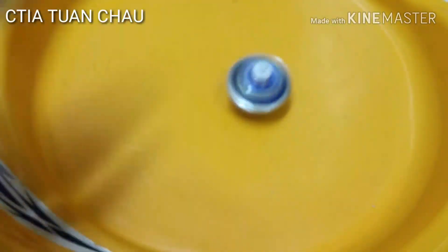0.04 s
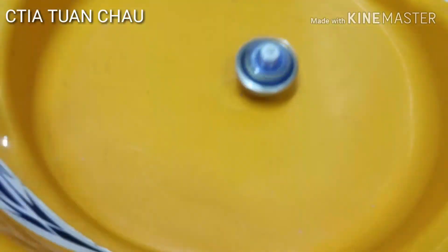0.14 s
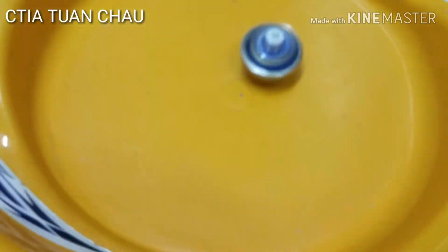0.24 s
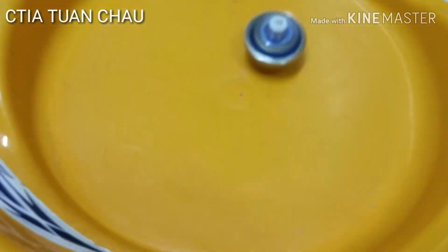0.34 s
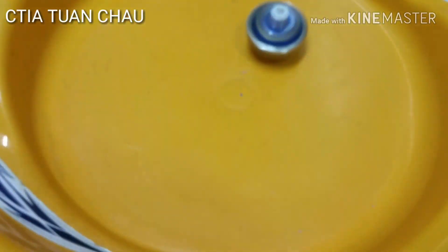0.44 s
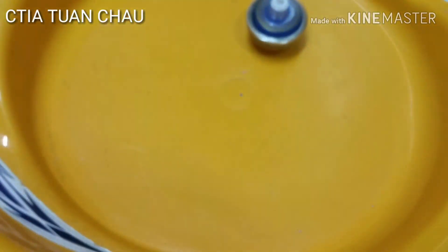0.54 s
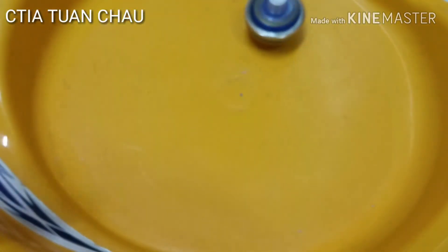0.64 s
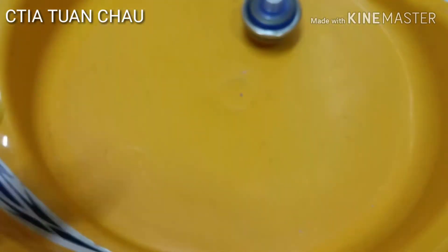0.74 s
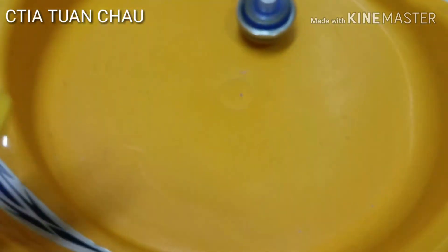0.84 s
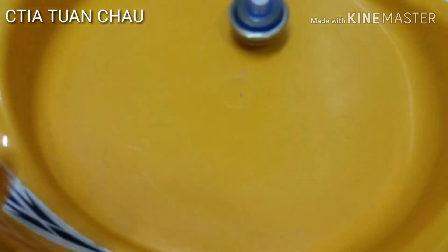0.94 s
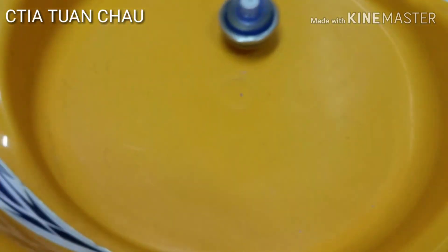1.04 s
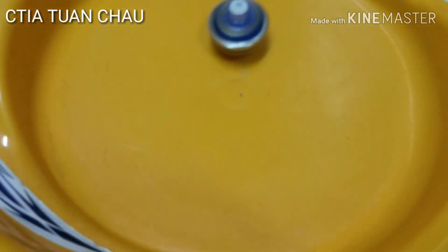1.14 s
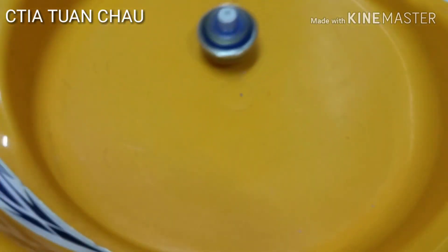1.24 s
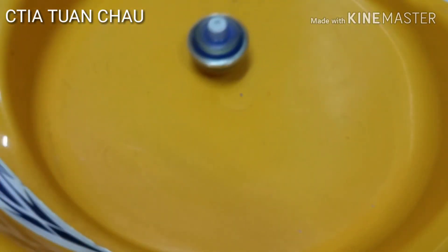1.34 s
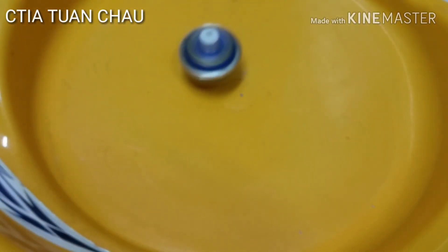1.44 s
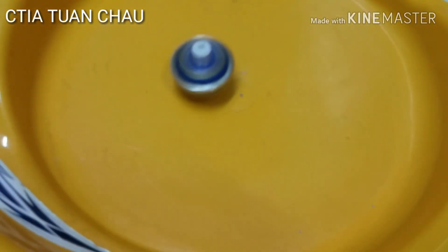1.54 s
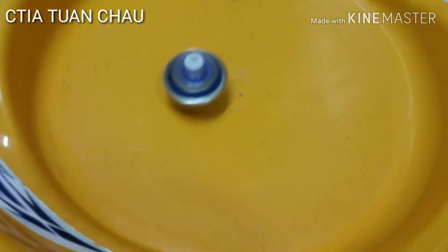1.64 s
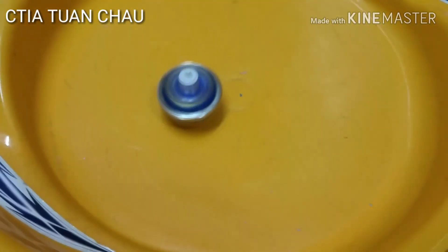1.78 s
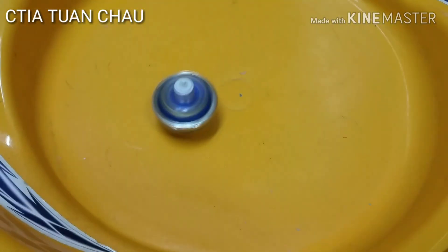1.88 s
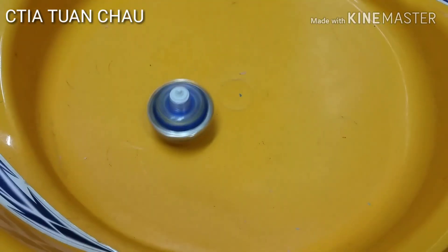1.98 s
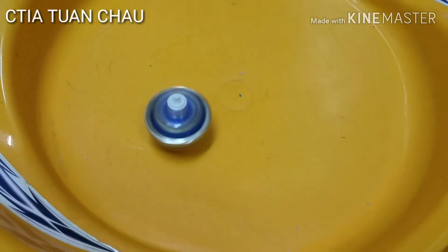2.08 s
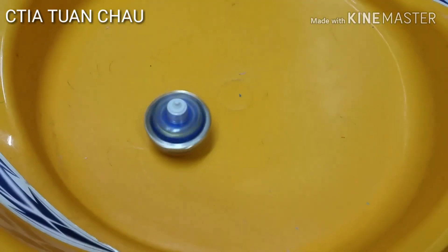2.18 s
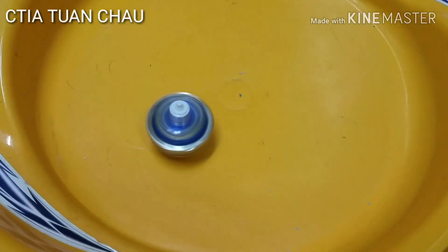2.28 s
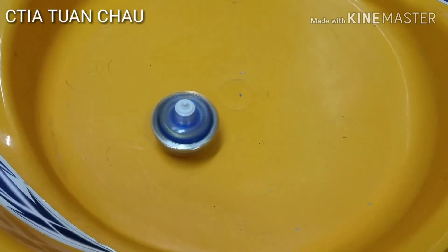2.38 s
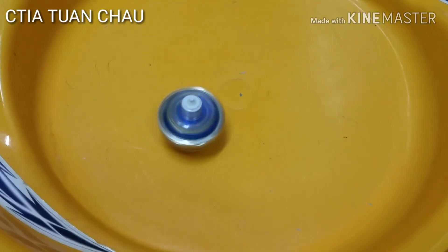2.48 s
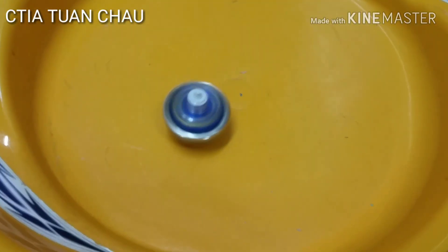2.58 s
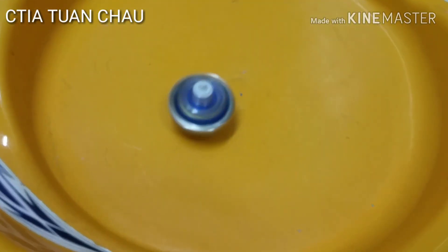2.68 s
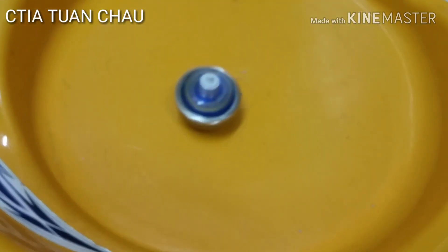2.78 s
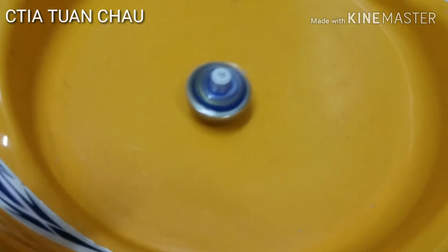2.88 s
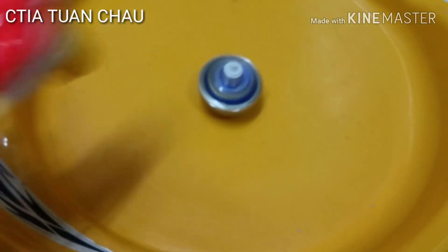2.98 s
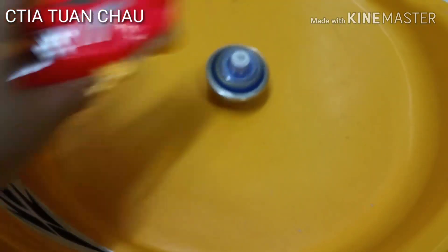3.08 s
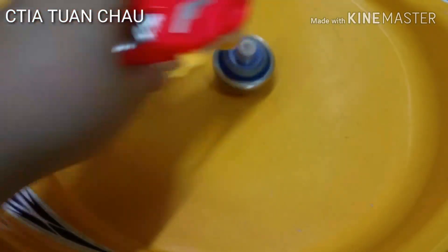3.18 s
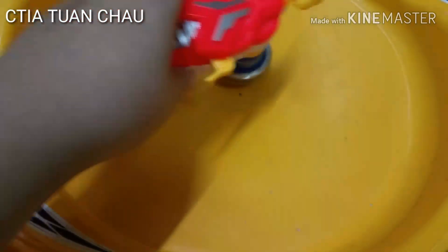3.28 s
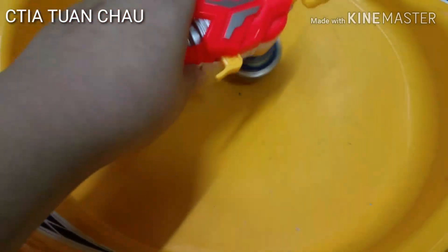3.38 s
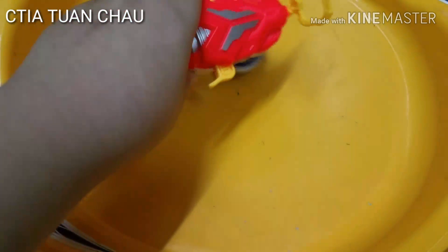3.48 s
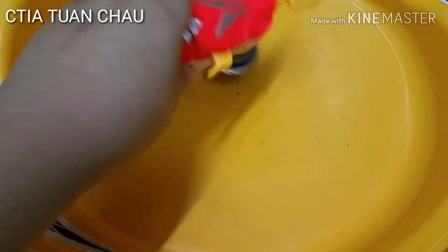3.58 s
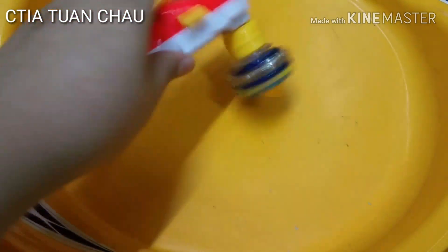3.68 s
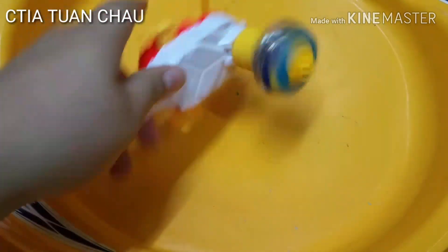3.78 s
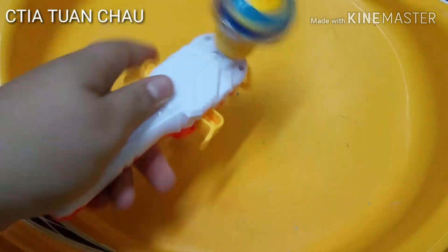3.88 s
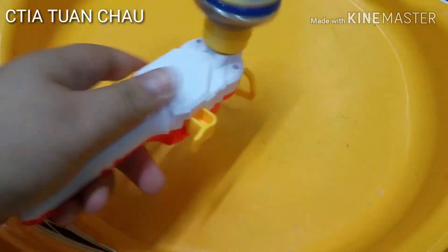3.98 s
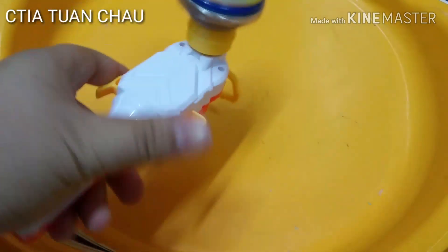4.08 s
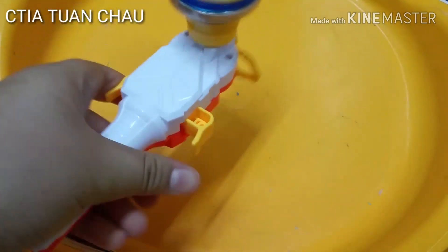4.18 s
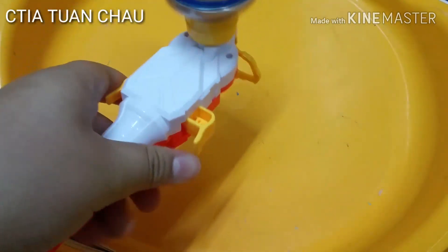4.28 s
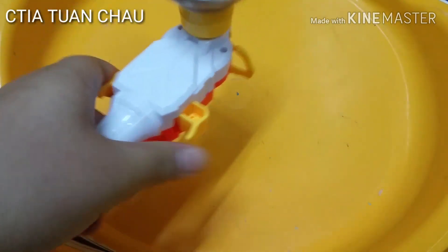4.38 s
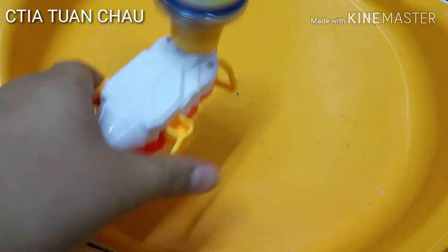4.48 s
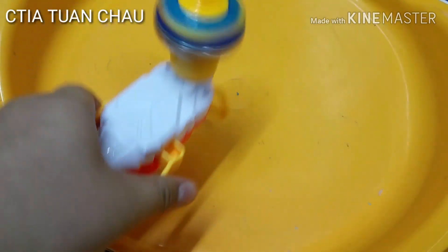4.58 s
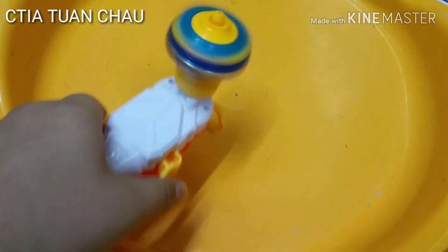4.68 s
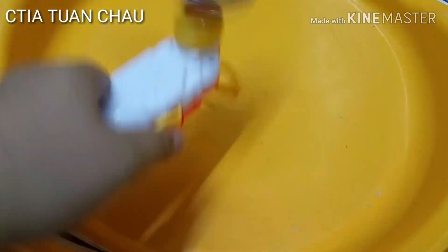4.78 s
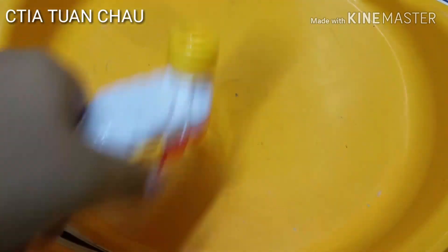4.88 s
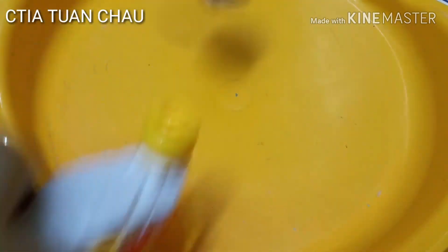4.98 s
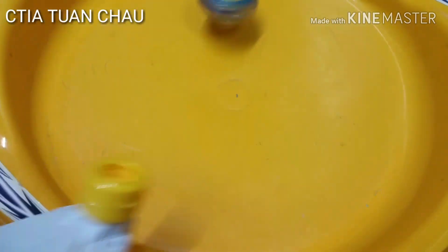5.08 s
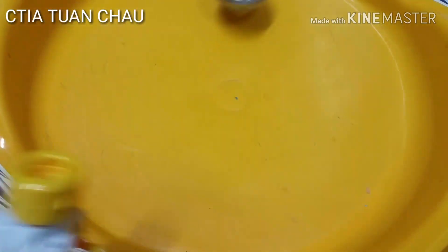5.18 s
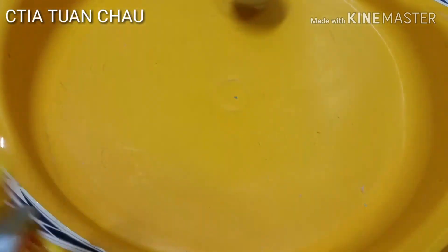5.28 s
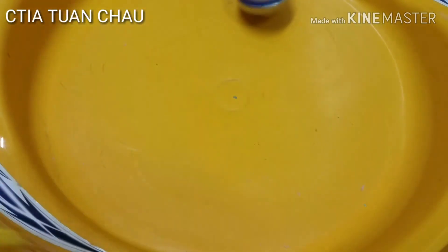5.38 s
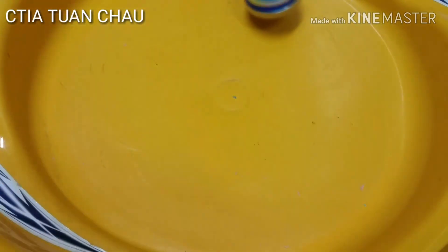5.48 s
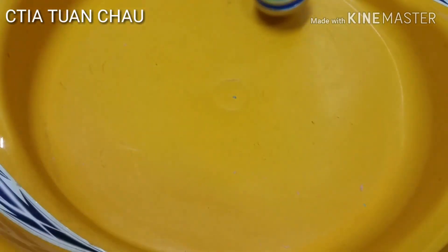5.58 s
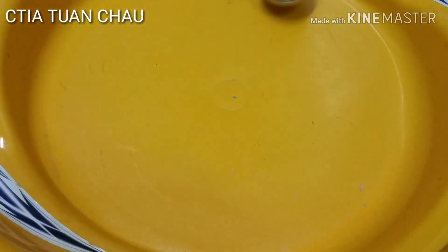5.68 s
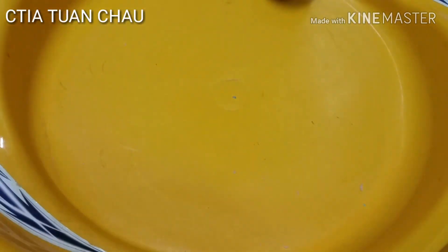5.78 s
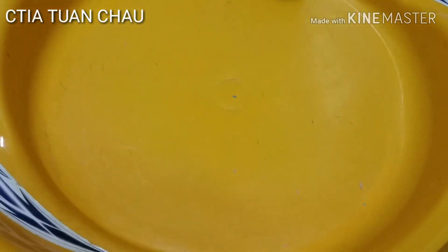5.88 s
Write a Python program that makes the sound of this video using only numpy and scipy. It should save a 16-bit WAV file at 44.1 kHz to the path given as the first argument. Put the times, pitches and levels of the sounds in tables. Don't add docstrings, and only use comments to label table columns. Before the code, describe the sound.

A phone close to a plastic basin in a small room, with a low unsteady fan hum and soft air noise behind. From 0 to 3.3 s a metal-rimmed top spins quietly, slightly left: an airy whir around 2.4 kHz, fine rasp and hiss, dipping near 0.2-0.7 s, with faint low basin tones swelling and a few light ticks at the start and near 3.0-3.2 s. At 3.35 s a plastic launcher catches it: a dense burst of sharp clicks and harsh scraping for a tenth of a second, grinding, then hollow knocks at 3.5-3.6 s. Loose gears rattle brightly, with a snap at 3.73 s, weakening in waves until 5.1 s; another snap at 4.84 s. At 5.11 s the top drops with a huge hollow boom, strong bounces at 5.16 and 5.23 s, then smaller, shrinking knocks and a faint roll to about 5.95 s. The fan ducks after the boom, then returns.

```python
import sys
import numpy as np
from scipy import signal
from scipy.fft import rfft, irfft, next_fast_len
from scipy.io import wavfile
from scipy.ndimage import uniform_filter1d, map_coordinates

SR = 44100
rng = np.random.default_rng(int(sys.argv[2]) if len(sys.argv) > 2 else 0)


def boost(x):
    u = np.asarray(x, float) / 20
    return 10 ** u


def to_wav(sig):
    pcm = np.clip(np.atleast_2d(sig), -1, 1) * 32767
    pcm = np.round(pcm).astype(np.int16)
    wavfile.write(sys.argv[1], SR, pcm.T)


N = 261954
TOP_HZ = 15600
SEATED_S = 3.49

# (frequency [Hz], width [Hz], level [dB])
SHELL = [(1977, 330, 2.5), (2430, 830, 1.5), (2795, 76, 6), (3130, 600, -3.5), (4190, 520, 0.5)]
# (frequency [Hz], density [dB per Hz])
FIZZ = [(3000, -41.5), (4300, 1.5), (5300, -0.5), (6500, -4.5), (7500, -5.5), (9500, -4.5), (11500, -9),
        (13000, -11.5), (15400, -12), (16200, -68)]
# (frequency [Hz], width [Hz], level [dB])
HOLLOW = [(454, 780, -8.5), (955, 176, 3), (1197, 210, 1), (1694, 290, 3)]
# (frequency [Hz], width [Hz], level [dB])
SOCKET = [(2120, 340, -0.5), (2378, 97, 5.5), (2700, 660, -13)]
# (frequency [Hz], likeness [0-1])
RATTLE_ALIKE = [(100, 0.95), (600, 0.95), (1500, 0.59), (3000, 0.18), (8000, 0.088)]
# (frequency [Hz], level [dB], decay t60 [s])
BOOM = [(108, -2, 0.3), (166, -1, 0.227), (230, -0.5, 0.15), (253, 1.5, 0.11), (278.6, -2.5, 0.48),
        (331.4, -10.5, 0.46), (352, -2.5, 0.12), (389, 1.5, 0.12), (434, -1, 0.08), (495, -12, 0.3),
        (559, -8, 0.24), (626, -14, 0.076), (818, -31.5, 0.13)]


def unit(x):
    return x / np.sqrt(np.mean(x ** 2) + 1e-20)


def along(points, hz):
    f, v = np.transpose(points)
    return np.interp(np.log(hz + 1), np.log(f + 1), v)


def curves(rows):
    s, *cols = np.transpose(rows)
    t = np.arange(N) / SR
    return np.array([np.interp(t, s, c, left=-150, right=-150) for c in cols])


def wobble(rate):
    coarse = np.arange(0, N + 64, 64)
    knots = rng.standard_normal(int(N * rate / SR) + 4)
    return np.interp(np.arange(N), coarse, map_coordinates(knots, [coarse * rate / SR]))


def filtered(x, response):
    n = x.shape[-1]
    m = 2 * next_fast_len(n // 2 + 2048)
    return irfft(rfft(x, m) * response(np.fft.rfftfreq(m, 1 / SR)), m)[..., :n]


def body(modes):
    def response(f):
        return sum((-1) ** k * boost(db) * 1j * f * w / (c * c - f * f + 1j * f * w)
                   for k, (c, w, db) in enumerate(modes))
    return response


def colour(spectrum):
    def response(f):
        cep = irfft(np.log(boost(along(spectrum, f)) + 1e-6))
        half = len(cep) // 2
        folded = np.r_[cep[0], 2 * cep[1:half], cep[half], np.zeros(len(cep) - half - 1)]
        return np.exp(rfft(folded))
    return response


def grit(rate, spread_db, smooth):
    touch = (rng.random(N) < rate / SR) * boost(spread_db * np.clip(rng.standard_normal(N), -2, 2))
    life = np.exp(-np.arange(96) / 22)
    return (unit(np.convolve(touch, life)[:N]) + smooth) * rng.standard_normal((2, N))


def spread(pair, response, alike, lead=0, patchy_db=2.5):
    z = signal.stft(pair, nperseg=512)[2]
    field = uniform_filter1d(rng.standard_normal(z.shape[1:]), size=3, axis=0)
    field = uniform_filter1d(field, size=12, axis=1)
    pair = signal.istft(z * boost(patchy_db * unit(field)), nperseg=512)[1][:, :N]

    def turn(f):
        return np.arccos(np.clip(along(alike, f), -1, 1)) / 2

    mid, side = filtered(pair, lambda f: response(f) * (f < TOP_HZ) * [np.cos(turn(f)), np.sin(turn(f))])
    return unit(np.array([np.roll(mid + side, -round(lead)), mid - side]))


def sides(pan_db):
    return boost(np.array([[pan_db / 2], [-pan_db / 2]]))


def spinning():
    # (time [s], rub of the tip [dB], give of the basin under it [dB])
    runs = [
        [(0, -50.5, -39), (.17, -58, -58), (.7, -61.5, -61.5), (.78, -52.5, -62), (1.0, -49.5, -62),
         (1.28, -52.5, -48), (1.35, -54, -44.5), (1.5, -53.5, -45), (1.95, -54.5, -47), (2.3, -57, -56),
         (2.85, -56.5, -58), (3.05, -54, -43), (3.345, -57, -45)],
        [(5.45, -60, -47), (5.55, -85.5, -51), (5.66, -77.5, -42), (5.94, -89.5, -47)],
    ]
    # (frequency [Hz], width [Hz], level [dB])
    bearing = [(2880, 150, -2.5), (3500, 1000, -1.5), (4150, 1120, -1), (5120, 1000, -12)]
    # (frequency [Hz], density [dB per Hz])
    torn_air = [(4500, -8), (5800, 1.5), (7000, -2.5), (8000, 0.5), (9000, -4), (10000, -2), (11500, -13),
                (13000, -10), (14200, -5.5), (15400, -16)]
    # (frequency [Hz], density [dB per Hz])
    floor = [(71, 7.5), (120, -0.5), (237, 0), (328, -2.5), (533, -3), (619, -9), (1050, -7), (1330, -17.5),
             (1900, -7.5), (2470, -45), (4180, -120)]
    near = [(200, 1.0), (1000, 0.85), (10000, 0.05)]  # (frequency [Hz], left-right likeness [0-1])

    rasp_db, drum_db = np.max([curves(rows) for rows in runs], axis=0)
    rub_db = rasp_db + 55
    whir_db = -53.5 + 0.4 * rub_db
    whir_db = whir_db - 0.2 * np.maximum(drum_db + 57.5, 0)
    hiss_db = -55.5 + 0.64 * rub_db
    digging = uniform_filter1d(np.clip(np.gradient(rasp_db) * SR, 0, 60), size=SR // 10)
    whir_hz = 2380 + 7 * digging + 45.08 * wobble(5)
    nod = wobble(24.1)

    slow = [filtered(grit(1500, 3.6, smooth=1.7), lambda f: 1 / (1 + 1j * f / 380) ** 2) for _ in range(2)]
    turns = 2 * np.pi * np.cumsum(whir_hz) / SR
    band = slow[0] * np.cos(turns) + slow[1] * np.sin(turns)
    whir = boost(whir_db + .8 * nod) * spread(band, np.ones_like, near, lead=17, patchy_db=1.5)
    rasp = boost(rasp_db + 0.23 * nod) * spread(grit(1900, 4.3, smooth=0.61), body(bearing), near, lead=17)
    hiss = boost(hiss_db + 0.088 * nod) * spread(grit(1900, 6.9, smooth=1.7), colour(torn_air), near, lead=17)
    drum = spread(rng.standard_normal((2, N)), colour(floor), near, lead=9.9)
    drum = boost(drum_db - 1.5 + 0.94 * wobble(26.3)) * drum
    return sides(2.35) * (whir + rasp + hiss + drum)


def singing():
    # (start [s], end [s], frequency [Hz],
    # level [dB])
    sung = [(-.02, 0.09, 108, -44.5), (0.104, 0.265, 516, -58), (0.202, 0.627, 235.6, -62.5),
            (.95, 1.2, 349.5, -64.5), (1.106, 1.564, 235, -52.5), (1.25, 1.86, 548, -59),
            (1.417, 1.785, 275.3, -54), (1.621, 1.761, 515, -60), (1.814, 2.016, 595, -61.5),
            (1.876, 2.197, 267.8, -53.5), (2.544, 2.885, 272.4, -58), (3.348, 3.384, 200.3, -28.5),
            (3.362, 3.45, 71.3, -30), (3.458, 3.62, 109, -34.5), (5.88, 5.945, 173.2, -47.5),
            (3.612, 3.679, 290, -26.5)]
    out, t = np.zeros(N), np.arange(N) / SR
    for start, end, hz, db in sung:
        swell = np.clip(np.minimum(t - start, end - t) / (0.17 * (end - start)), 0, 1)
        level = boost(db + 2.5 + 1.6 * wobble(6.7))
        cycles = hz * t + np.cumsum(1.14 * wobble(18)) / SR
        out += swell * level * np.sin(2 * np.pi * cycles)
    return out


def catch():
    # (time [s], scraping [dB])
    braking = [
        (3.347, -70),
        (3.37, -29.5),
        (3.445, -24),
        (3.475, -44),
        (3.53, -38),
        (3.68, -42),
        (4.05, -71),
    ]
    scrape_db, = curves(braking)
    t = np.arange(N) / SR
    grind_db = -32.5 - .7 * np.maximum(scrape_db + 34, 0)
    grind_db = grind_db - 150 * np.maximum(t - 3.653, 0)
    grind_db = grind_db - 150 * (t < braking[0][0])
    basin = [(hz, 30, db) for hz, db, _ in BOOM]
    scrape = spread(grit(350, 3.3, smooth=0.82), body(SOCKET), RATTLE_ALIKE, lead=2)
    grind = spread(grit(300, 1.3, smooth=0.99), body(basin), RATTLE_ALIKE)
    return boost(scrape_db) * sides(-1.5) * scrape + boost(grind_db) * grind


def rattle():
    # (time [s], shaking [dB])
    shaking = [
        (3.347, -29),
        (3.55, -34),
        (3.8, -34.5),
        (3.94, -34.5),
        (4.12, -40),
        (4.25, -37.5),
        (4.6, -40),
        (4.9, -37.5),
        (5.105, -51),
    ]
    shell_db, = curves(shaking)
    shake_db = shell_db + 36
    fizz_db = -36.5 + shake_db
    hollow_db = -41 + 1.77 * shake_db
    chatter = grit(1200, 0.61, smooth=1.0) * boost(1.13 * wobble(45))
    fine = unit(grit(2000, 1.7, smooth=0.96)) * np.std(chatter)
    shell = spread(chatter, body(SHELL), RATTLE_ALIKE, lead=3)
    fizz = spread(0.75 * chatter + fine, colour(FIZZ), RATTLE_ALIKE, lead=3)
    hollow = spread(grit(600, 3.6, smooth=0.88), body(HOLLOW), RATTLE_ALIKE)
    return (boost(shell_db) * sides(-0.75) * shell + boost(fizz_db) * sides(-2.0) * fizz
            + boost(hollow_db + 0.43 * wobble(30)) * hollow)


def snaps():
    # (time [s], peak [dB], brightness [dB])
    stutter = [(3.347, -12.5, -7.5), (3.3528, -12, 0), (3.3624, -17, -4), (3.377, -19, -2),
               (3.392, -12, -5), (3.4024, -21.5, 6.5), (3.4167, -17.5, 1), (3.4247, -15.5, -5),
               (3.4343, -26.5, -2), (3.4502, -14.5, -3), (3.4579, -7, -3), (3.468, -8, 3)]
    # (time [s], peak [dB], brightness [dB])
    slips = [(3.5234, -15.5, 5), (3.6206, -23, -12), (3.719, -16.5, -2), (3.7275, -9.5, -3.5),
             (3.8934, -21, 2), (4.14, -23, -2), (4.1949, -21.5, -5), (4.2147, -23, 2.5), (4.2482, -23, 0.5),
             (4.282, -26, -15), (4.415, -27, 4), (4.4767, -26, 2), (4.4834, -23, 6.5), (4.6159, -22, 2),
             (4.7111, -29, 6), (4.8357, -11.5, -4), (4.897, -35, 16), (4.9723, -30, 11.5),
             (5.4334, -25.5, 4), (5.789, -30, 2), (5.833, -45, -5), (5.9085, -47, -0.5)]
    out, t = np.zeros((2, N + SR)), np.arange(SR // 16) / SR
    for s, db, bright_db in stutter + slips:
        seated = s >= SEATED_S
        dull_db, pan_db = np.array([-9, -1]) + rng.standard_normal(2) * [1, .5]
        length_ms = (6.65 if seated else 2.6) + 0.38 * (db + 18.5)
        u = t / (abs(length_ms) * 0.00034 + 1e-4)
        shared, own = rng.standard_normal(len(t)), rng.standard_normal((2, len(t)))
        burst = u * np.exp(1 - u) * (shared + 2.37 * own)
        paths = (body(SHELL if seated else SOCKET), colour(FIZZ), body(HOLLOW))
        parts = [filtered(burst, path) for path in paths]
        gains = boost(db + np.array([0, bright_db, dull_db]))
        slip = sum(g * p / np.abs(p).max() for g, p in zip(gains, parts))
        out[:, round((s - .0005) * SR):][:, :len(t)] += sides(pan_db) * slip
    return out[:, :N]


def ring(modes, t, factor, attack, twist):
    luck = rng.standard_normal((len(modes), 2)) * [2, .008]
    x = 0
    for k, ((hz, db, t60), (more_db, shift)) in enumerate(zip(modes, luck)):
        fade = boost(db + more_db - 60 * t / (t60 * factor))
        x = x + fade * np.sin(2 * np.pi * hz * (1 + shift) * t + twist * k)
    x = x * (1 - np.exp(-t / attack))
    return x / np.abs(x).max()


def knocks():
    # (time [s], boom [dB], hardness [dB]); tip first is hard, a rock onto the rim is soft
    blows = [(0.001, -33.5, -11), (0.104, -39.5, -5.5), (0.125, -40.5, -4.5), (3.028, -37, -22),
             (3.174, -36.5, -9.5), (3.347, -27, 1.5), (3.402, -24.5, 4.5), (3.522, -17.5, -9),
             (3.599, -13.5, 1.5), (3.611, -16, -23), (4.711, -36.5, 0), (5.11, 1, -8.5),
             (5.161, -6.5, -20.5), (5.229, -3.5, -7.5), (5.279, -17, -35), (5.3255, -13, -6.5),
             (5.4254, -16, -2), (5.467, -25.5, -12.5), (5.524, -25, -4), (5.561, -26, -3.5),
             (5.613, -31.5, -9.5), (5.641, -27.5, -13.5), (5.733, -41.5, -2.5), (5.922, -32.5, -31.5),
             (5.933, -27.5, -18.5)]
    # (frequency [Hz], level [dB], decay t60 [s])
    high_modes = [(687, -2, 0.093), (913, -1, 0.11), (1011, -1.5, 0.14), (1113, 2, 0.047),
                  (1293, -11, 0.083), (1472, 4.5, 0.058), (1766, -1.5, 0.1), (2246, -8.5, 0.23),
                  (2230, -11, 0.085), (2813, -9, 0.11)]
    # (frequency [Hz], density [dB per Hz])
    close_modes = [(250, -0.5), (500, 13), (700, 3), (1100, -2), (1700, -8), (2500, -20.5), (4000, -32),
                   (8000, -81)]
    # (frequency [Hz], density [dB per Hz])
    contact = [(1500, -43.5), (2500, 0), (4500, -5), (7500, -14), (11000, -15.5), (16500, -19.5)]
    out, t = np.zeros((2, N + SR)), np.arange(SR // 3) / SR
    basin = [(hz, 28, db) for hz, db, _ in BOOM]
    for s, db, clack_db in blows:
        factor = 0.36 if 3.45 < s < 3.7 else 0.56
        crack_db = -3 + 0.86 * clack_db

        shudder = unit(filtered(rng.standard_normal((2, len(t))), body(basin)))
        shudder = shudder[0] + 0.17 * shudder[1] * np.array([[1], [-1]])
        rocking = boost(-60 * t / (0.33 * factor)) * (1 - np.exp(-t / 0.0023))
        boom = -ring(BOOM, t, factor, 0.0036, twist=-0.33) + 0.39 * rocking * shudder

        clack = np.array([ring(high_modes, t, factor, 0.00017, twist=1.353)
                          + 0.14 * ring(high_modes, t, factor, 0.0034, twist=side) for side in (.6, 2.4)])
        wash = rng.standard_normal(len(t)) + .5 * rng.standard_normal((2, len(t)))
        wash = filtered(wash, lambda f: colour(close_modes)(f) * (f < TOP_HZ))
        clack += 0.8 * boost(-60 * t / (0.3 * factor)) * unit(wash)
        clack += boost(-8.5 - .45 * max(db, -26) - 60 * t / 0.04) * np.sin(2 * np.pi * 1430 * t)

        grain = rng.standard_normal(len(t)) + rng.standard_normal((2, len(t)))
        buzz = 0.16 * boost(-60 * t / 0.22) * filtered(grain, lambda f: f < TOP_HZ)
        crack = filtered(boost(-60 * t / 0.015) * grain + buzz, colour(contact))

        blow = boom + boost(clack_db - 4.0) * clack + boost(crack_db) * crack / np.abs(crack).max()
        start = round((s + .0008) * SR)
        out[:, start:][:, :len(t)] += boost(db) * sides(0.5) * blow
    return out[:, :N]


def walls(x):
    # (frequency [Hz], decay t60 [s])
    decay = [(150, 0.23), (1000, 0.32), (4000, 0.12), (12000, 0.12)]
    hz, t, z = signal.stft(rng.standard_normal((2, SR // 2)), SR, nperseg=256)
    tail = signal.istft(z * boost(-60 * t / along(decay, hz)[:, None]), SR, nperseg=256)[1]
    late = np.pad(x, ((0, 0), (260, 0)))
    return signal.fftconvolve(late, tail / np.linalg.norm(tail[0]), axes=1)[:, :N]


def room_noise():
    # (time [s], gain [dB])
    auto_gain = [(0, -4.5), (.63, -7.5), (.85, -3), (1.04, 0.5), (1.5, 2), (3.3, 1), (5.06, 1.5),
                 (5.12, -14), (5.5, -1.5), (5.75, -8.5), (5.94, -8.5)]
    # (frequency [Hz], level [dB], width [Hz])
    fan = [(47.6, -44.5, 0.6), (102, -56, 8), (140.4, -58.5, 9.9), (178, -65, 13)]
    # (frequency [Hz], density [dB per Hz])
    room_air = [(35, -29), (60, -11.5), (110, -8.5), (160, -19.5), (250, -14), (450, -25), (900, -21.5),
                (1400, -24.5), (5000, -32), (9000, -44), (15500, -47.5)]
    # (frequency [Hz], likeness [0-1])
    air_alike = [(60, 0.74), (200, 0.91), (600, 0.42), (1500, 0), (8000, 0)]
    t = np.arange(N) / SR
    lines = 0
    for hz, db, w in fan:
        level = 2 ** .5 * boost(db + 0.31 * w * wobble(w + 2))
        cycles = hz * t + np.cumsum(w * wobble(w + 3)) / SR
        lines = lines + level * np.sin(2 * np.pi * cycles)
    air = spread(rng.standard_normal((2, N)), colour(room_air), air_alike, patchy_db=-0.3)
    air = boost(-52.0 + 1.9 * wobble(3.96)) * air
    return boost(curves(auto_gain)[0]) * (lines + air)


def scene():
    hits = knocks() + snaps()
    bright = filtered(hits, lambda f: (1j * f / (600 + 1j * f)) ** 2 * (f < TOP_HZ))
    echo = boost(-11) * walls(bright)
    return hits + echo + spinning() + singing() + catch() + rattle() + room_noise()


def top_cut(x):
    return signal.sosfilt(signal.butter(12, 16820, fs=SR, output="sos"), x)


def record(dry):
    dry = filtered(dry, lambda f: (1j * f / (34 + 1j * f)) ** 3)
    soft = dry / (1 + np.abs(dry / .95) ** 8) ** (1 / 8)
    soft = filtered(soft, lambda f: 1 / (1 + (f / 16200) ** 40))
    return top_cut(soft)


dry = scene()
out = record(dry)
to_wav(out)
```